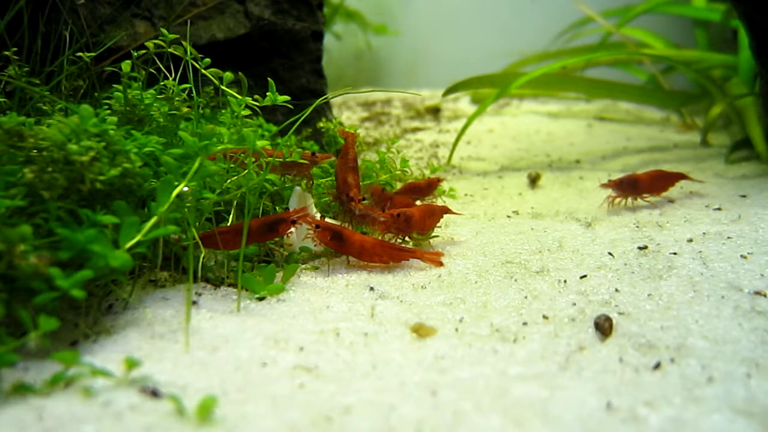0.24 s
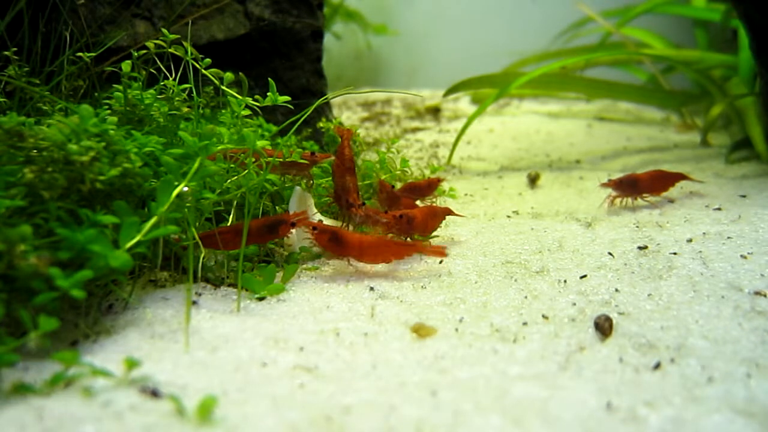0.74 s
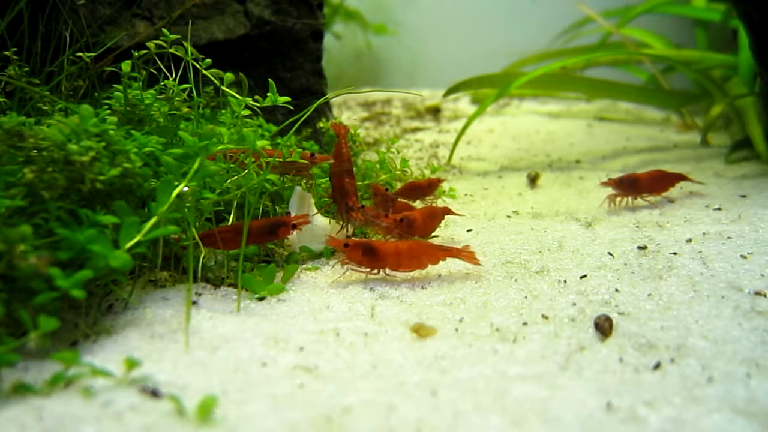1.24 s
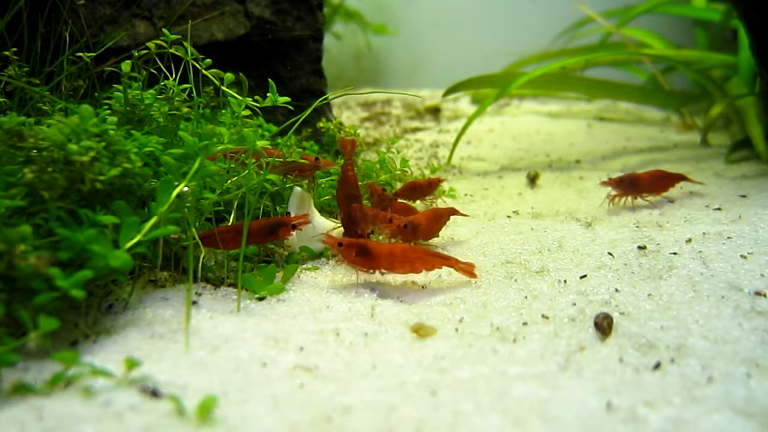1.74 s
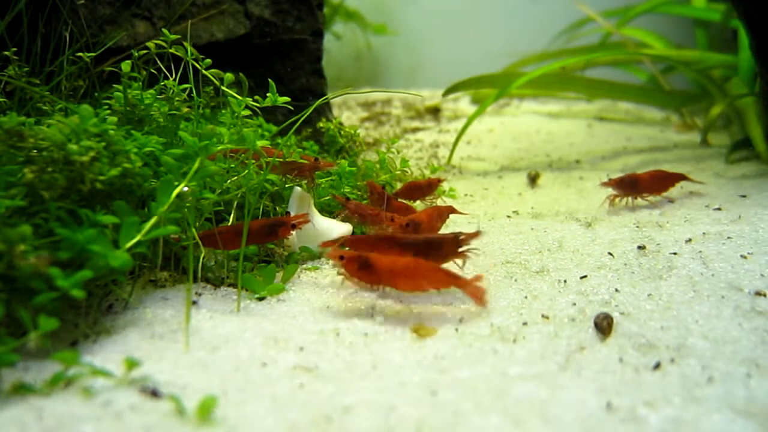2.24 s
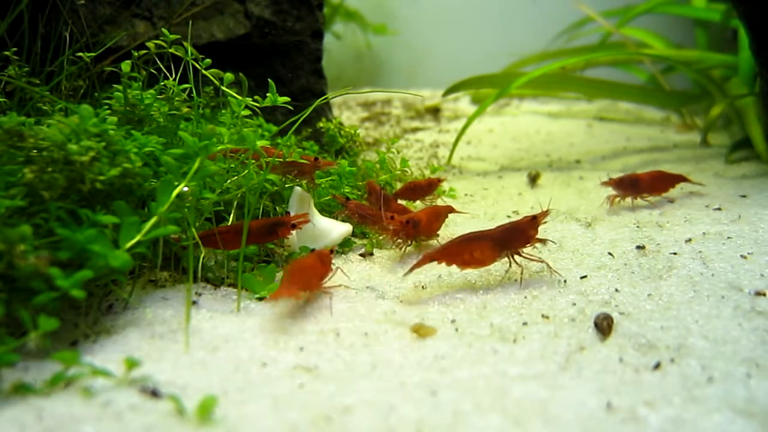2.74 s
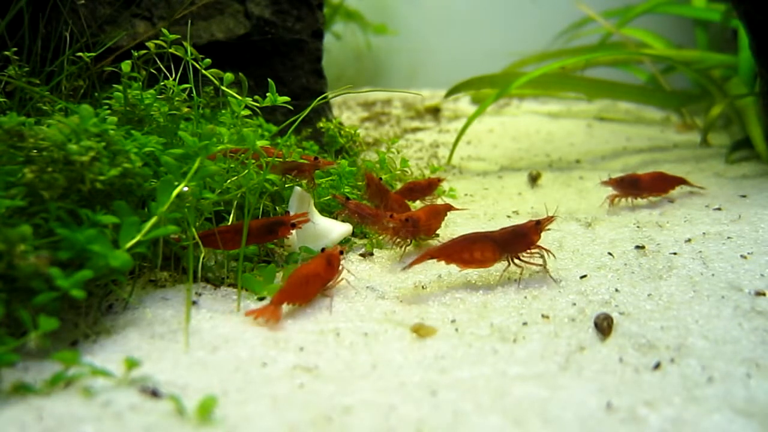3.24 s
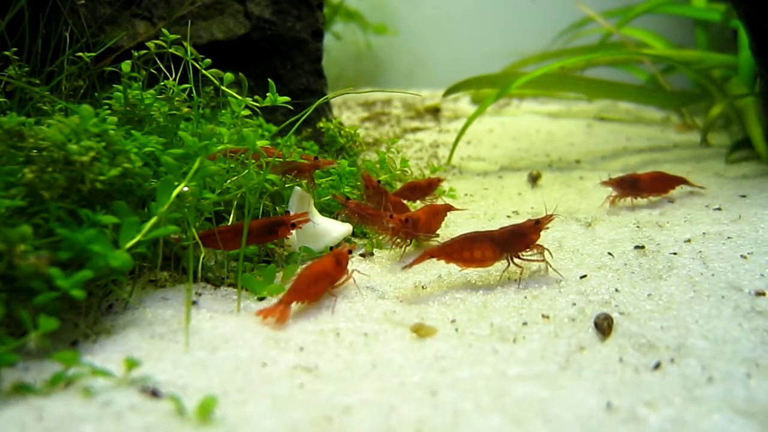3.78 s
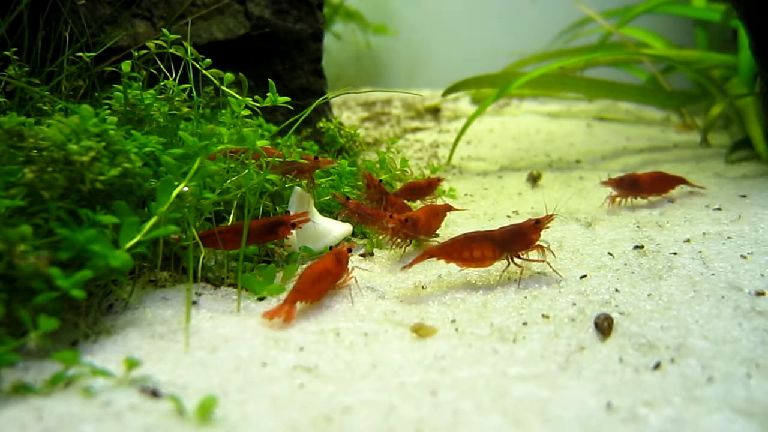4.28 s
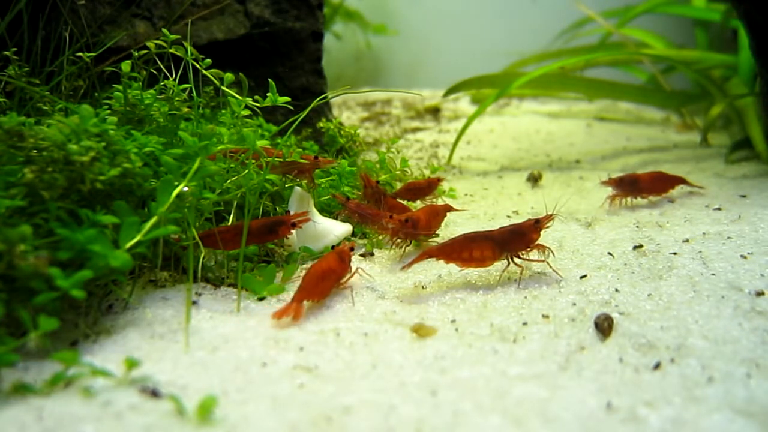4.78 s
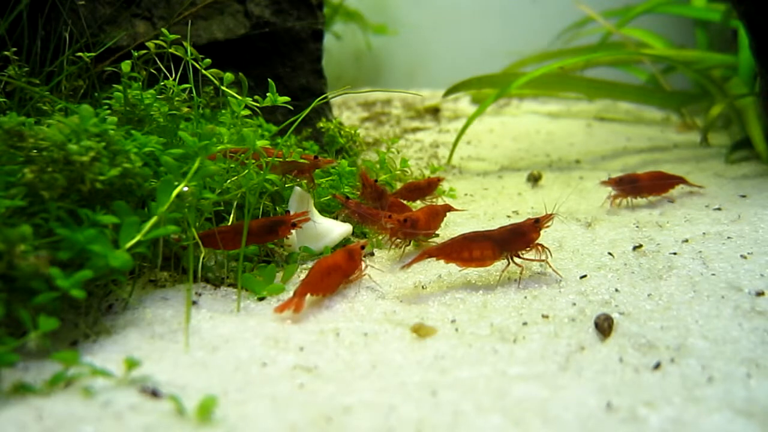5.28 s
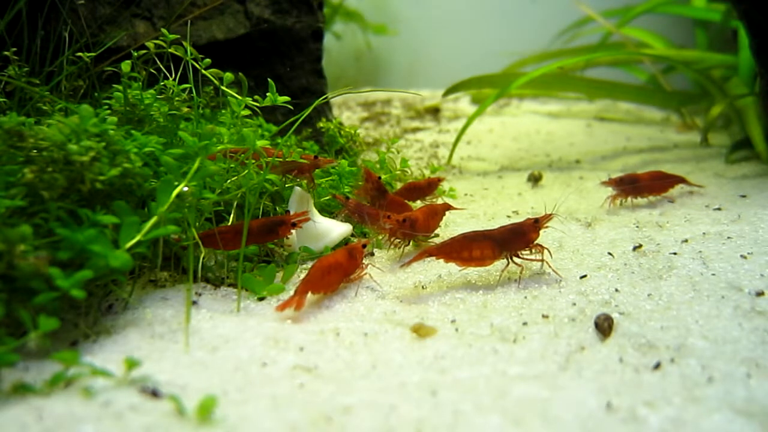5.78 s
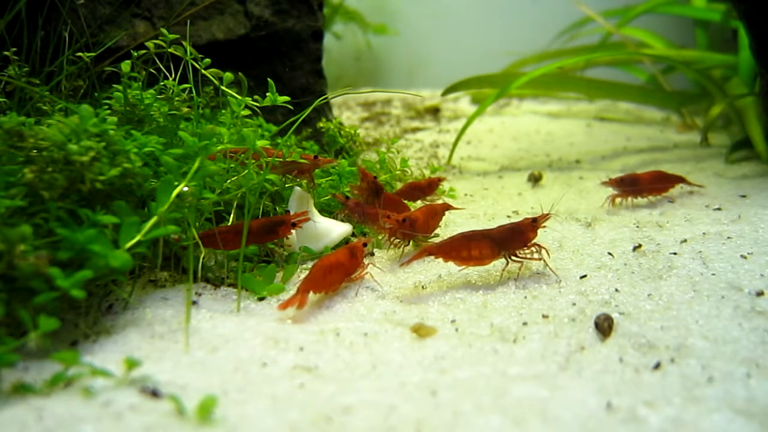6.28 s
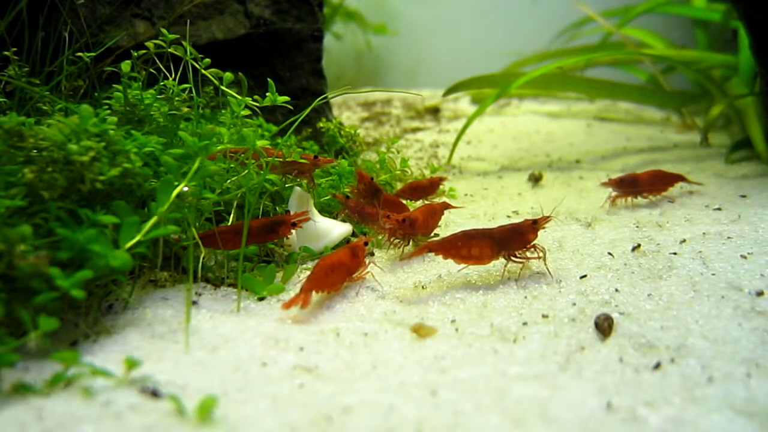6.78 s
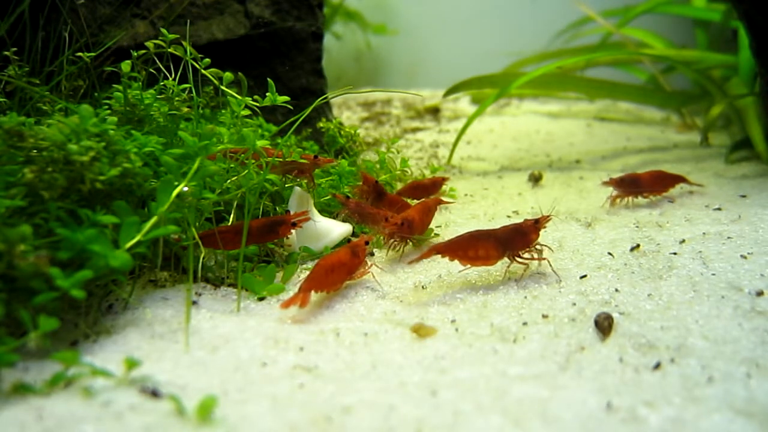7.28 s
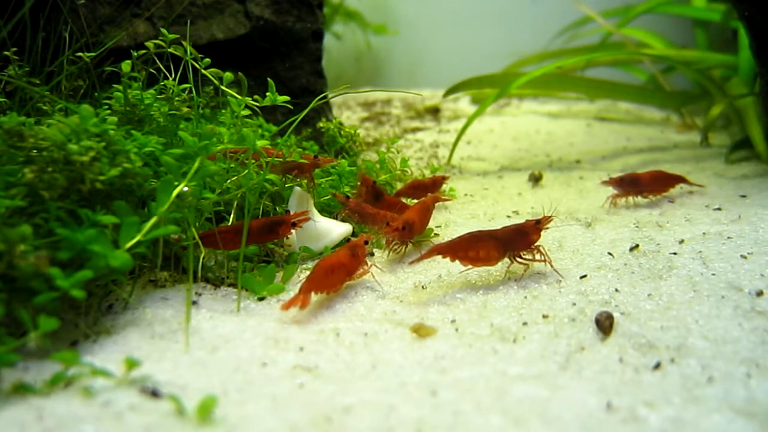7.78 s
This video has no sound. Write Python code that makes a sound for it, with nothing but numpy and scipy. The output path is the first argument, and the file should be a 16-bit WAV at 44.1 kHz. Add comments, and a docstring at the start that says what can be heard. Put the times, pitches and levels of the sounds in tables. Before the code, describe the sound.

From 0 to about 8 seconds, a pump on an aquarium holds a deep, steady electrical hum, heard from just outside the glass in a quiet room. The hum is strongest in the bass, around 100 and 150 hertz, with softer buzzing overtones above and only a tiny unsteadiness in level. It sits nearly central. Far below it, a soft, dull rush of air from a small fan spreads wide, fluctuating slightly. Within the air is a thin, faint, fluttering whine near 1.4 kilohertz, wrapped in a breathy whistle, with even weaker higher tones. Light microphone hiss lies underneath. Very faint, soft treble ticks occur at about 4.5 and 7.8 seconds, almost hidden. Nothing starts, stops or builds; the red shrimp moving over the pale sand are silent, and there is no splashing or bubbling.

```python
"""In a quiet room, just outside the glass of an aquarium, a pump hums steadily on 50 Hz mains.
The hum is a stack of mains multiples, coloured by the tank and slightly unsteady.
A small motor, likely a cooling fan, adds thin wavering sine tones, a breathy whistle around the
lowest of them, and a soft rush of air made from shaped noise.
Microphone hiss lies under it all, with two very faint ticks of treble noise."""
import sys
import numpy as np
from scipy import signal
from scipy.fft import rfft, irfft
from scipy.io import wavfile

SR = 44100
rng = np.random.default_rng(int(sys.argv[2]) if len(sys.argv) > 2 else 0)


def generate_wav(signal):
    """Clip the signal to [-1, 1] and save it as 16-bit WAV at the path in sys.argv[1]."""
    frames = np.transpose(np.atleast_2d(signal))
    scaled = np.clip(frames, -1, 1) * 32767
    pcm = np.round(scaled).astype(np.int16)
    wavfile.write(sys.argv[1], SR, pcm)


N = 353682
T, HZ = np.arange(N) / SR, np.fft.rfftfreq(N, 1 / SR)


def amp(db):
    """Decibels to gain."""
    return 10 ** (np.asarray(db) / 20)


def evened(x):
    """Scales to an rms of 1."""
    return x / np.sqrt(np.mean(x ** 2) + 1e-30)


def read(points):
    """A short spectrum joined by straight lines over log frequency."""
    hz, value = np.transpose(points)
    return np.interp(np.log(HZ + 1), np.log(hz), value)


def noise(gain):
    """Steady noise with the given gain per root Hz."""
    white = rfft(rng.standard_normal(N))
    return irfft(white * gain, N) * np.sqrt(SR / 2)


def drift(rate_hz):
    """Slow random movement of rms 1, up to about the given rate."""
    return evened(noise(np.exp(-(HZ / rate_hz) ** 2) * (HZ > 0)))


def bell(centre_hz, width_hz):
    """A resonance peak of height 1; the width is taken at half height."""
    return 1 / (1 + (2 * (HZ - centre_hz) / width_hz) ** 2)


# microphone hiss curve with a dip high in the treble: pitch_hz [Hz],
# level_db [dB per root Hz, before the hiss is lifted by root 2]
HISS_CURVE = [(100, -110), (4000, -111.3), (7000, -111.2), (9000, -116), (10000, -120), (11000, -125.5),
              (12000, -135), (13000, -127.5), (14000, -123), (15700, -121.5)]


def hiss():
    """Each microphone has its own smooth hiss."""
    gain = amp(read(HISS_CURVE))
    return np.sqrt(2) * np.array([noise(gain), noise(gain)])


# faint ticks: start_s [s, moment of the peak], level_db [rms dB at the peak], pitch_hz [Hz, centre before
# the hiss curve shades it], width_hz [Hz, centre to 1/e], length_s [s, peak to 1/e]
FAINT_TICKS = [(4.541, -67, 8000, 6000, .009), (7.833, -68, 6300, 1500, .012)]


def ticks():
    """Soft, brief puffs of treble noise, shaded by the microphone's dip."""
    out = np.zeros((2, N))
    for start_s, level_db, pitch_hz, width_hz, length_s in FAINT_TICKS:
        band = np.exp(-((HZ - pitch_hz) / width_hz) ** 2) * amp(read(HISS_CURVE))
        puff = np.exp(-((T - start_s) / length_s) ** 2)
        pair = evened(np.array([noise(band), noise(band)]))
        out += amp(level_db) * puff * pair
    return out


# rushing air as both sides share it: pitch_hz [Hz], level_db [dB per root Hz, before the hollows]
AIR_SHARED = [(10, -103), (25, -94), (42, -80.5), (75, -85), (130, -80.5), (200, -84.5), (270, -82),
              (430, -85), (560, -88.5), (800, -89), (950, -91.5), (1300, -92.5), (1600, -99), (2400, -101),
              (4000, -114)]
# rushing air as the sides differ: pitch_hz [Hz], level_db [dB per root Hz, before the hollows]
AIR_SPREAD = [(10, -98.5), (35, -85.5), (110, -78), (250, -79), (500, -82), (800, -86.5), (1200, -88.5),
              (1550, -90.5), (2300, -93), (2800, -101), (4000, -107.5), (7000, -113)]
# balance of the air, its brighter part a little to the left: pitch_hz [Hz], lean_db [dB, left minus right]
AIR_BALANCE = [(700, -0.3), (1300, 1.4), (2400, 1.3), (4400, -0.5)]
# hollow resonances of the housing that colour the air:
# pitch_hz [Hz], width_hz [Hz], mid_boost_db [dB], side_boost_db [dB]
HOUSING_HOLLOWS = [(655, 26, 4.5, 1.5), (847, 40, 0, 3), (1730, 150, 3, 1.5), (2195, 220, 2.5, -2.5),
                   (3080, 240, 2.5, 1.5)]


def air(swell_db=0.53, swell_rate_hz=7.6, top_hz=7200):
    """Turbulent air, coloured by the housing and scattered round the room."""
    mid_db, side_db = read(AIR_SHARED), read(AIR_SPREAD)
    for pitch_hz, width_hz, mid_boost_db, side_boost_db in HOUSING_HOLLOWS:
        peak = bell(pitch_hz, width_hz)
        mid_db = mid_db + mid_boost_db * peak
        side_db = side_db + side_boost_db * peak
    dull = 1 / (1 + (HZ / top_hz) ** 12)
    mid, side = noise(amp(mid_db) * dull), noise(amp(side_db) * dull)
    # each side takes half of the lean, in opposite directions
    lean = amp(np.outer([.5, -.5], read(AIR_BALANCE)))
    pair = irfft(rfft([mid + side, mid - side]) * lean, N)
    return pair * amp(swell_db * drift(swell_rate_hz))


def whistle(pitch_hz=1414, width_hz=165, level_db=-64.5, lead_rad=1.4):
    """Air whistling in the housing's strongest resonance: a breathy band whose right side leads in phase."""
    # the root-Hz gain follows the bell, so the power falls as its square
    band = rfft(evened(noise(bell(pitch_hz, width_hz))))
    return amp(level_db) * irfft([band * np.exp(-1j * lead_rad), band], N)


# the fan's whine: pitch_hz [Hz], level_db [rms dB], lead_rad [radians by which right leads left]
FAN_WHINE = [(1393, -67.5, 1.83), (2274, -85.5, 1.8), (2395, -84, .8), (3294, -83, 2), (4739, -96, 0.89),
             (6600, -98.5, 1.4)]


def whine(wander=.00015, wander_rate_hz=2.5, flutter=0.31, flutter_rate_hz=16.0):
    """Thin motor tones share one wandering speed, and each flutters on its own in the air stream."""
    clock_s = np.cumsum(1 + wander * drift(wander_rate_hz)) / SR
    out = np.zeros((2, N))
    for pitch_hz, level_db, lead_rad in FAN_WHINE:
        angle = 2 * np.pi * (pitch_hz * clock_s + rng.random())
        size = np.sqrt(2) * amp(level_db) * evened(1 + flutter * drift(flutter_rate_hz))
        out += size * np.cos([angle - lead_rad, angle])
    return out


MAINS_HZ, GLASS_LAG_RAD = 50.016, .57
# starting levels (rms dB, before the tank's colour) at the 2nd and 3rd multiples, and their slopes
EVEN_DB, EVEN_DB_PER_OCTAVE = -44.9, -14.5
ODD_DB, ODD_DB_PER_OCTAVE = -46, -14
# multiples that the tank favours or swallows: multiple [of the mains frequency], boost_db [dB]
TANK_COLOUR = [(4, -26), (5, 6.3), (6, 7.5), (7, -4), (8, 6), (13, 7.5), (16, 11), (24, 16)]


def hum_db(order):
    """Level of one mains multiple: a steady fall per octave, coloured by the tank."""
    if order % 2:
        level_db = ODD_DB + ODD_DB_PER_OCTAVE * np.log2(order / 3)
    else:
        level_db = EVEN_DB + EVEN_DB_PER_OCTAVE * np.log2(order / 2)
    return level_db + sum(boost_db for multiple, boost_db in TANK_COLOUR if round(multiple) == order)


def pump(waver=0.0086, unsteady_db=-85, left_db=-0.24, count=24):
    """The motor shakes the tank at multiples of the mains; the glass passes higher orders on later."""
    out = np.zeros(N)
    load = 1 + waver * drift(1.4)
    for order in range(2, count + 1):
        # water churning at the impeller unsettles the weak orders most
        churn = amp(unsteady_db) * drift(3.5)
        size = amp(hum_db(order)) * load + churn
        angle = 2 * np.pi * order * MAINS_HZ * T - GLASS_LAG_RAD * order ** 2
        out += np.sqrt(2) * size * np.cos(angle)
    return out * amp([[left_db], [-left_db]])


def scene():
    """Hiss, ticks, air, whistle and whine under the pump's hum."""
    return hiss() + ticks() + air() + whistle() + whine() + pump()


def record(dry, edge_hz=15740):
    """The recorder's steep band limit: a long low-pass filter on both sides."""
    lowpass = signal.firwin(1023, edge_hz, window=("kaiser", 9), fs=SR)
    return signal.oaconvolve(dry, lowpass[None], "same")


dry = scene()
out = record(dry)
generate_wav(out)
```